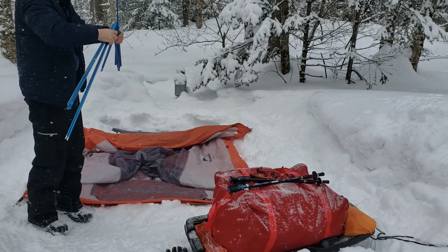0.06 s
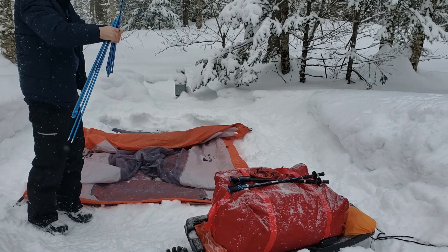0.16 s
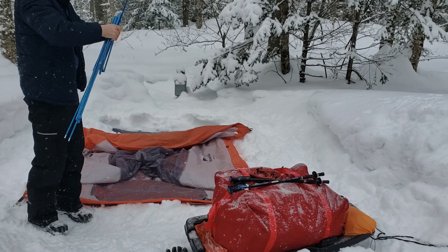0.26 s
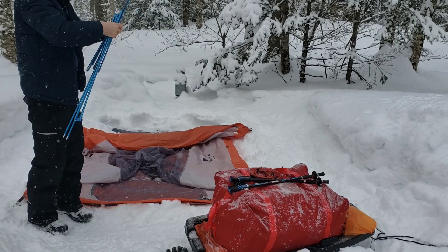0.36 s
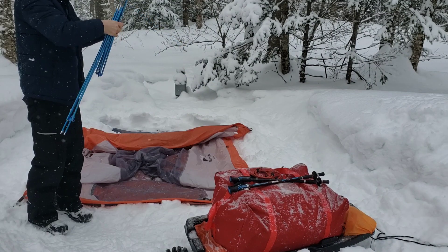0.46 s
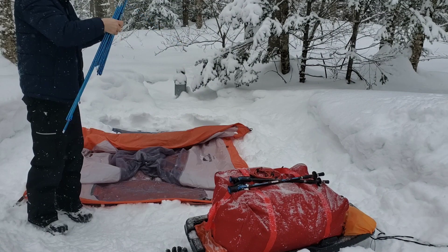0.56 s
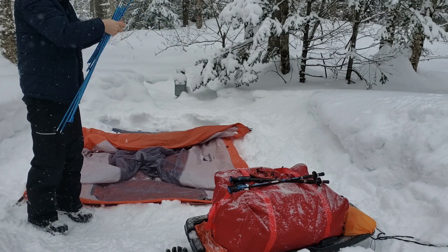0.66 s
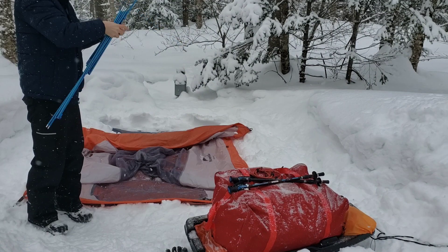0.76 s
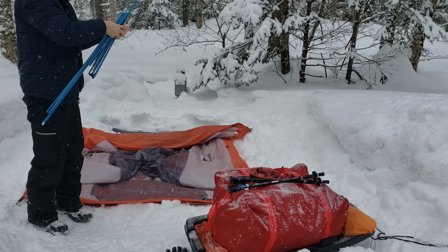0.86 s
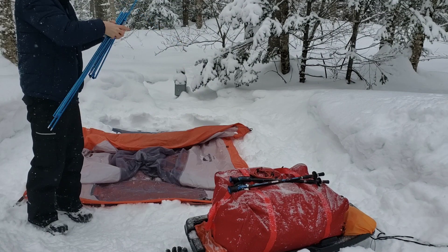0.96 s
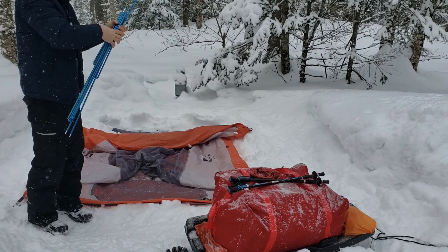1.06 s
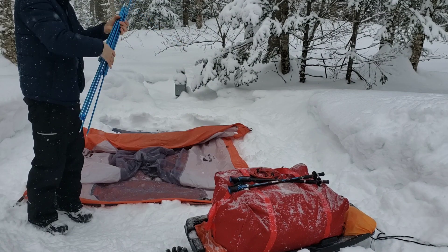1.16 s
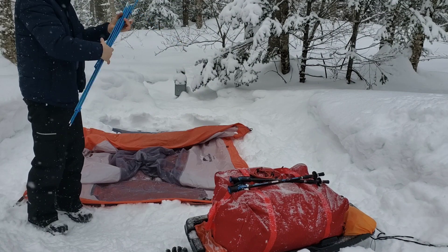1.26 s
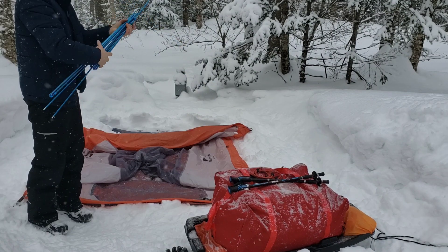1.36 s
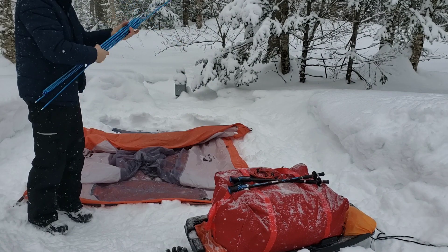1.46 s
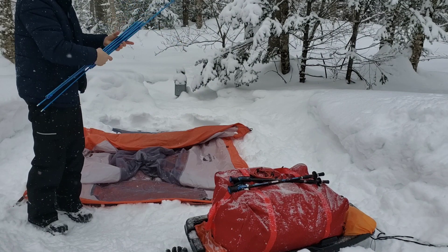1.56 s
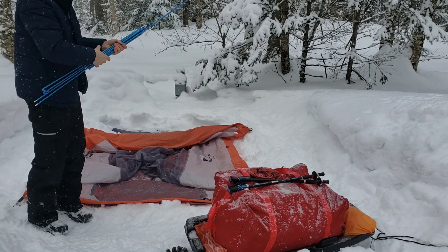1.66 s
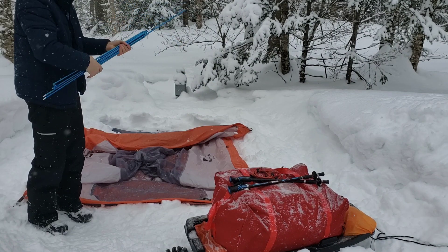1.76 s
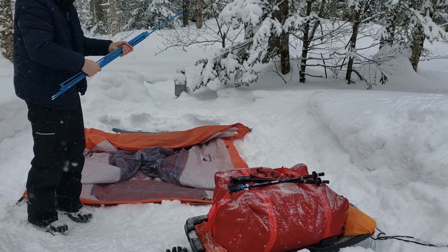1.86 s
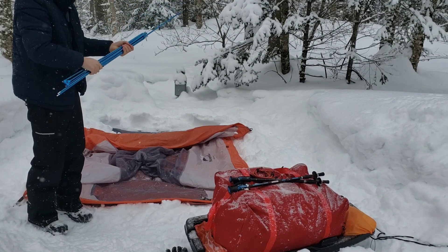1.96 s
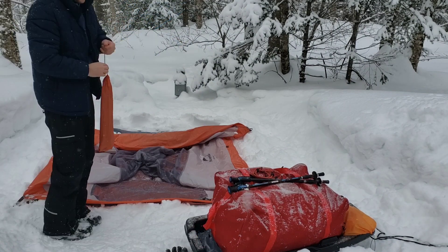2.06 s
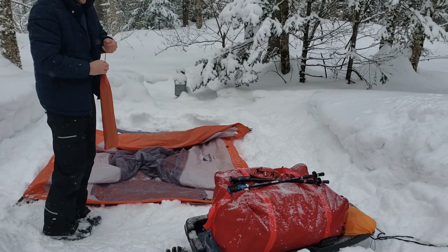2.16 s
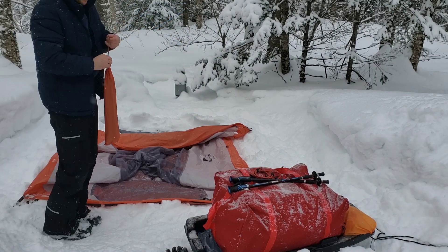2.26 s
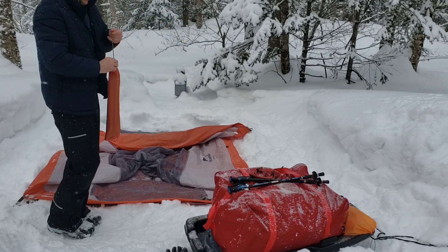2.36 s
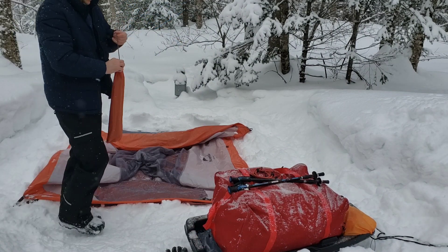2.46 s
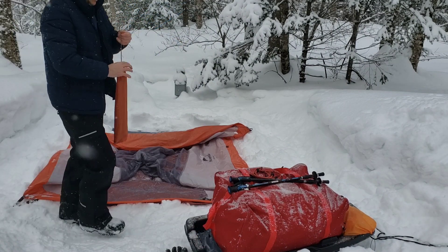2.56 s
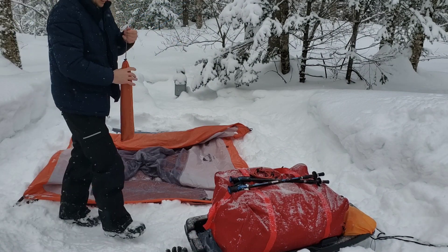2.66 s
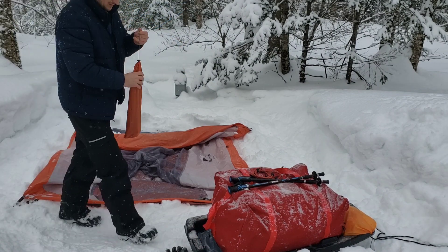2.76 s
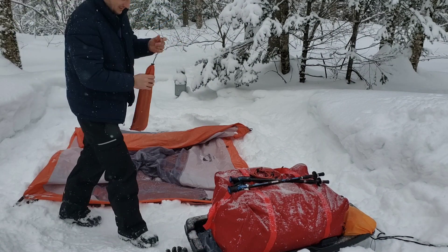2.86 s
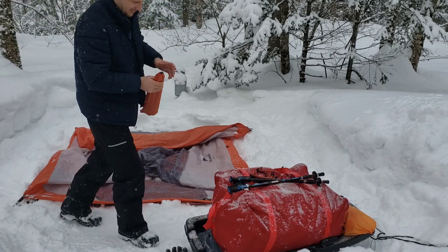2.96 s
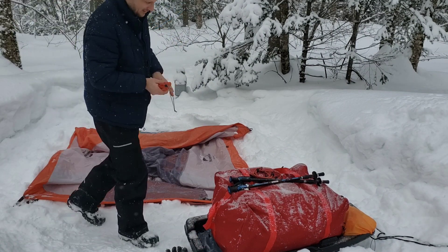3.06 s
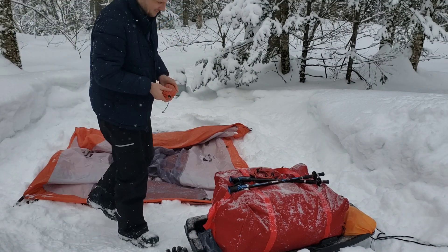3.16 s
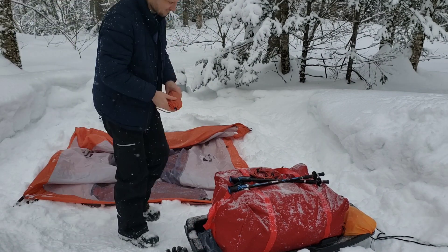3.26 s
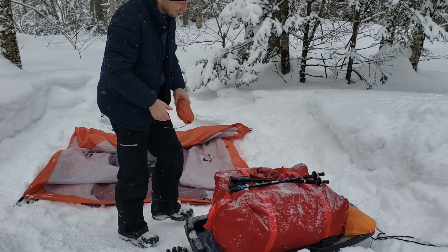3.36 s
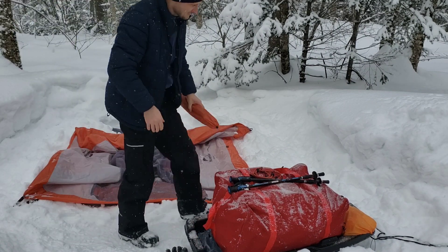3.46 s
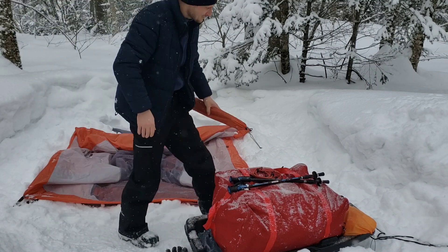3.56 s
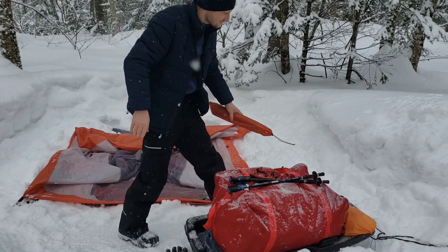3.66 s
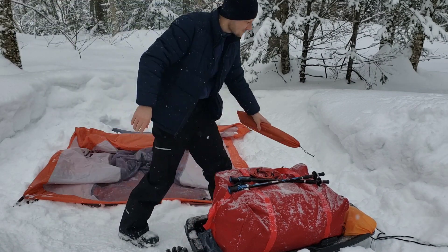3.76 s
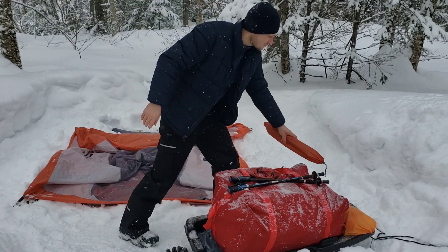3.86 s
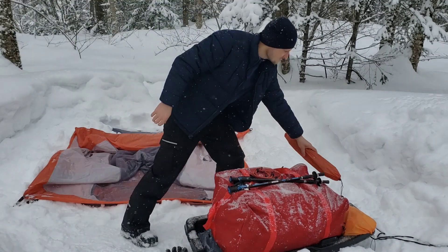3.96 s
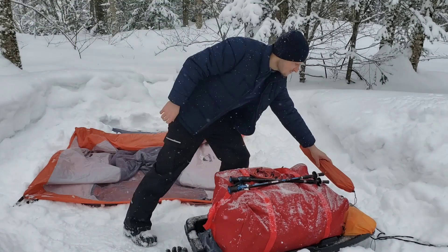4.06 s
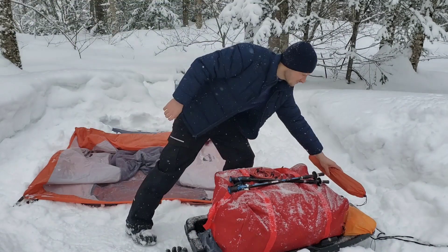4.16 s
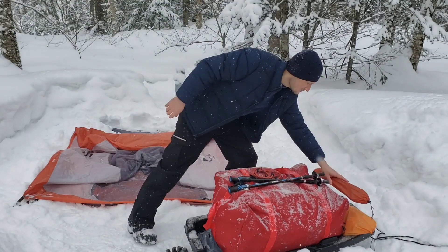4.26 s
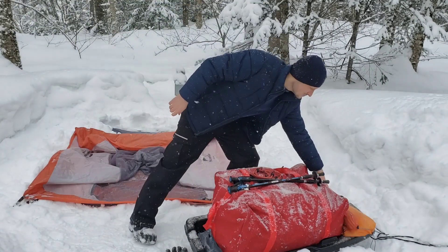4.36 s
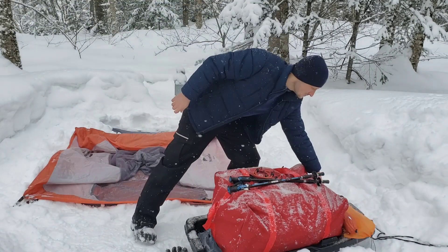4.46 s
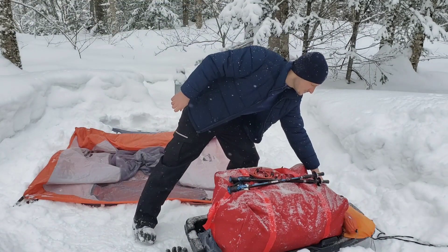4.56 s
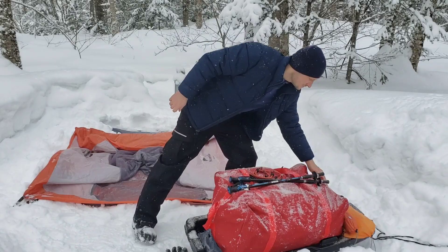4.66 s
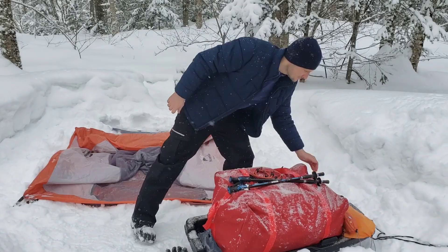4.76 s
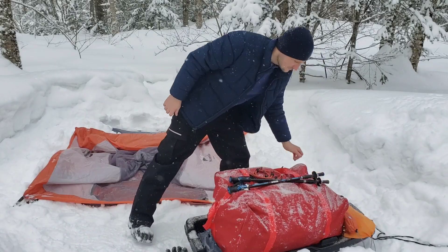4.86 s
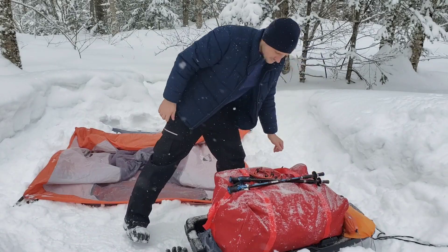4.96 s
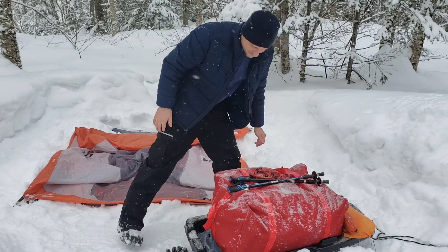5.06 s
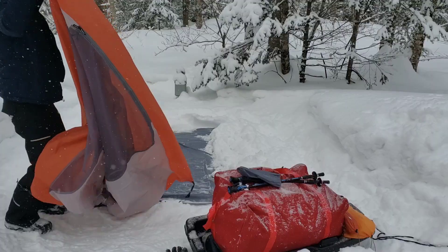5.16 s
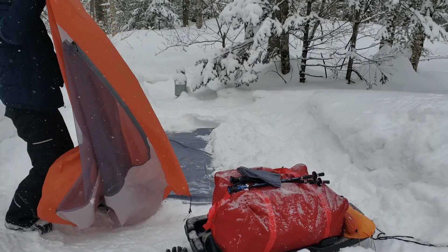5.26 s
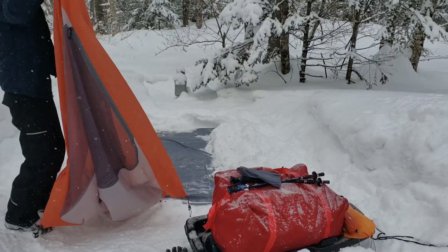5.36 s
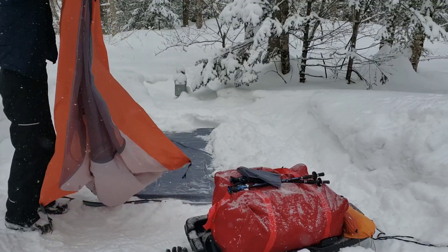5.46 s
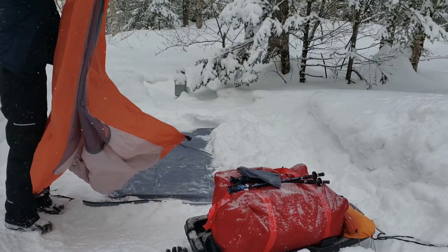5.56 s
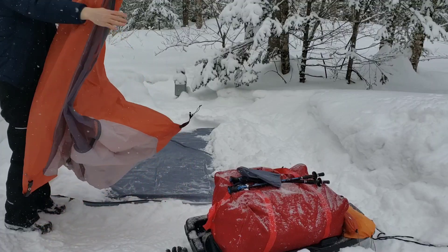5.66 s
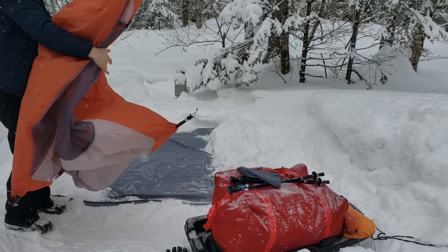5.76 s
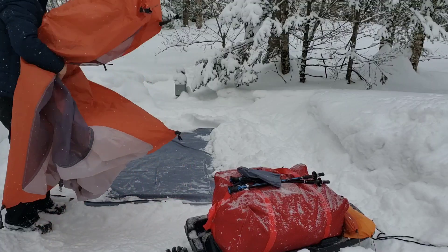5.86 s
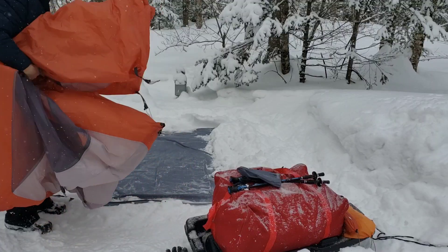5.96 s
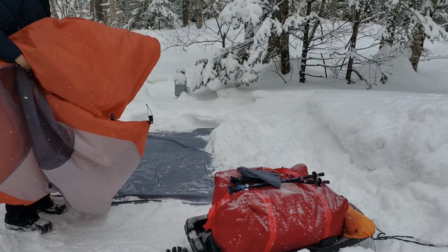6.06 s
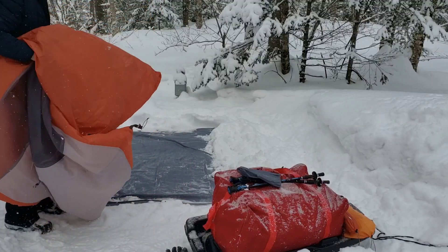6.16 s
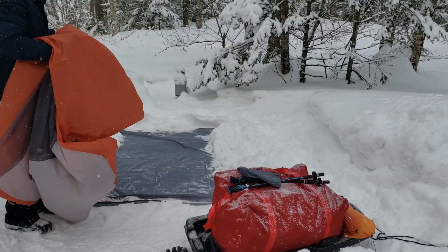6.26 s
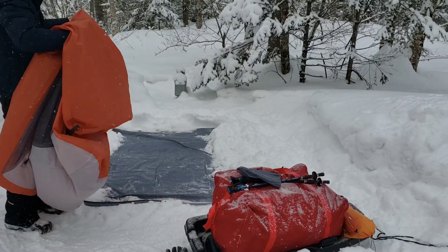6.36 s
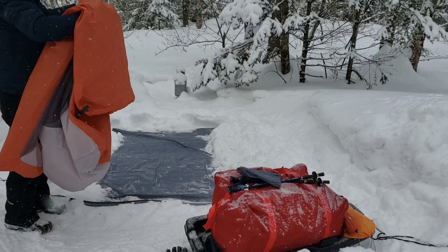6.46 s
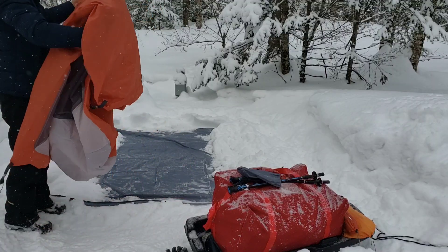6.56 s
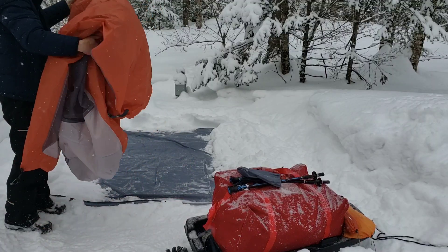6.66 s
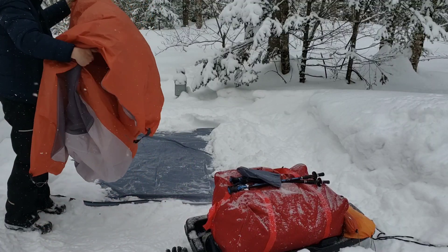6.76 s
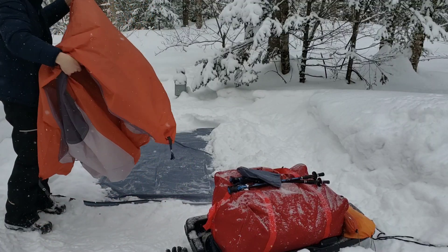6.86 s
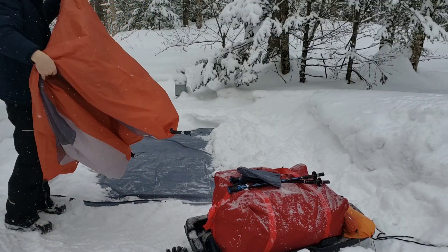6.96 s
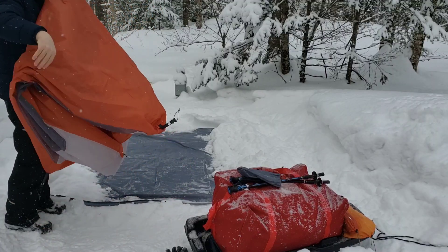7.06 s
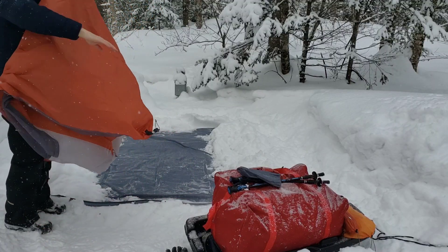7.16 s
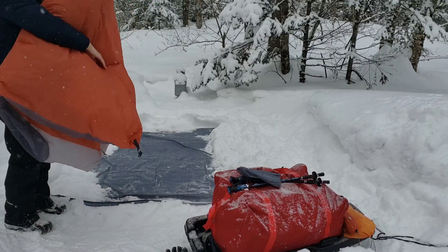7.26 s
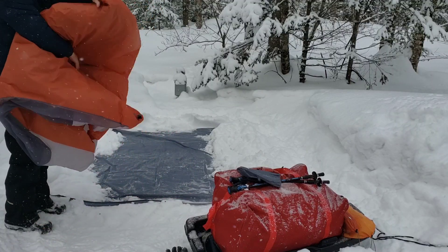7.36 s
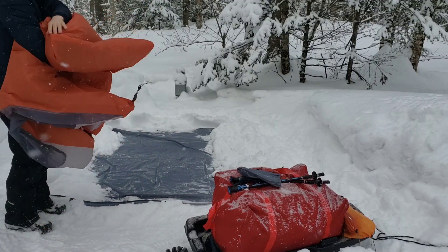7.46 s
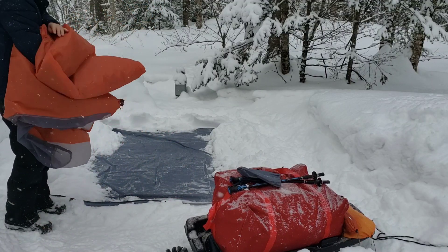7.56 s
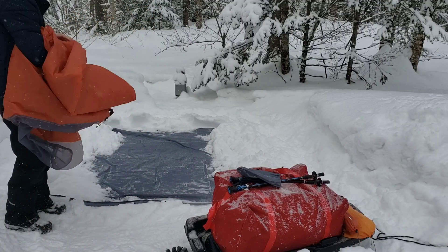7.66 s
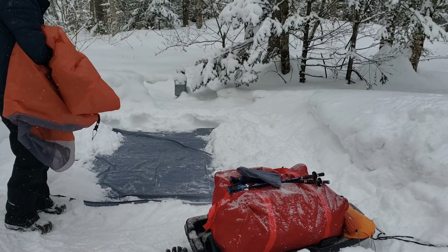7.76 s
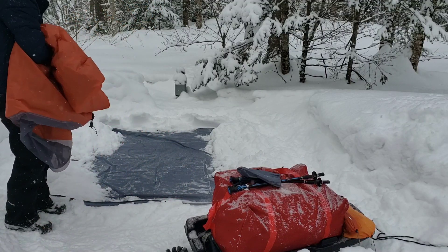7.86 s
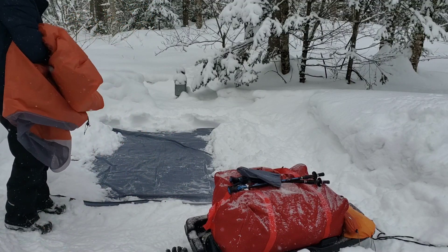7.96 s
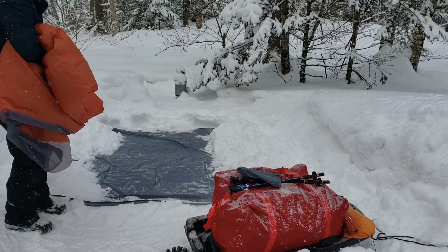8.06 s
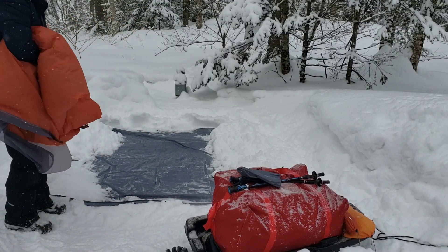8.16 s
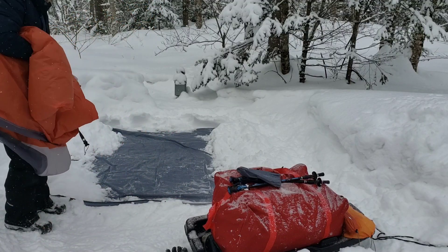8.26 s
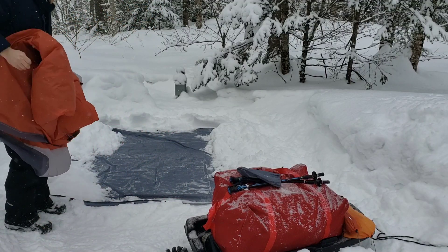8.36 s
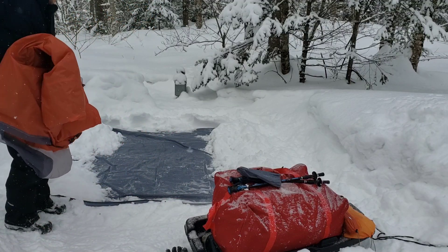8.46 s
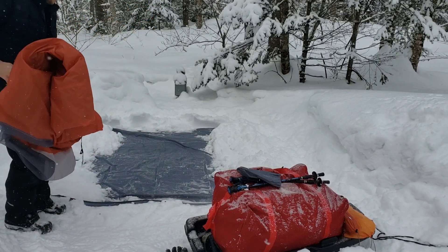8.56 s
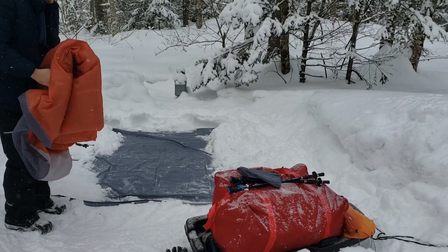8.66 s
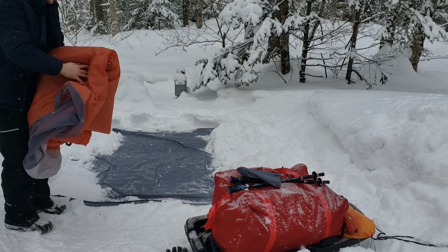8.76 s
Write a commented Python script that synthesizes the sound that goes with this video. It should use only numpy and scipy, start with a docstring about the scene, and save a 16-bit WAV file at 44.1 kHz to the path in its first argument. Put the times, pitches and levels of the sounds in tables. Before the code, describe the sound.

Outdoors in deep snow, a bundle of light aluminium poles clacks and scrapes, growing into a dense rattle. Sleeves swish and boots crunch softly, then a stuff sack lands with a crinkly slap on a duffel. A nylon tent is lifted, gathered, shaken once and rolled with broad rustling. Stereo microphone a few steps away, no echo, faint hiss and light breeze.

```python
"""Folded aluminium poles clack and scrape at once, over a faint hiss and a light breeze on the microphone.
Place: deep snow that returns no echo; a camper packs a tent a few steps from two microphone ports.
Sleeves swish, creases tick and boots squeeze the snow; a stuff sack lands on a duffel; then the nylon tent is
lifted, gathered, shaken once and rolled up. Poles are noise bursts, struck and sliding; snow is groaning
sines with noise; cloth is grainy friction noise in three bands; the breeze is low noise."""
import sys
import numpy as np
from scipy import signal
from scipy.fft import rfft, irfft, next_fast_len
from scipy.io import wavfile
from scipy.ndimage import map_coordinates

SR = 44100
rng = np.random.default_rng(int(sys.argv[2]) if len(sys.argv) > 2 else 0)


def materialize(psi):
    """Save the field psi as 16-bit PCM at rate SR to the path in sys.argv[1].

    A 1-D psi becomes a single channel; in a 2-D psi each row is a channel.
    """
    bounded = np.clip(np.atleast_2d(psi).T, -1, 1)
    quanta = np.round(bounded * 32767).astype(np.int16)
    wavfile.write(sys.argv[1], SR, quanta)


N = 388080


def amp(db):
    """Decibels to gain."""
    return 10 ** (np.asarray(db) / 20)


def unit(x):
    """Scale to rms 1."""
    return x / np.sqrt(np.mean(x ** 2) + 1e-20)


def along(points, hz):
    """Read a curve of (frequency [Hz], value) points on a log frequency axis."""
    f, v = np.transpose(points)
    return np.interp(np.log(hz + 1), np.log(f + 1), v)


def gains(rows, fade=0.0169):
    """A gain per sample for each dB column, closing within fade seconds outside the rows' span."""
    s, *columns = np.transpose(rows)
    t = np.arange(N) / SR
    gate = np.clip(1 + np.minimum(t - s[0], s[-1] - t) / fade, 0, 1)
    return np.array([gate * amp(np.interp(t, s, column)) for column in columns])


def swell(s, rise, t60):
    """A gain that climbs to its peak at s by 60 dB per rise and falls by 60 dB per t60."""
    t = np.arange(N) / SR
    distance = np.maximum((s - t) / rise, (t - s) / t60)
    return amp(np.maximum(-60 * distance, -150))


def puffs(rows):
    """A gain with one smooth bump for each (time [s], length [s], level [dB])."""
    t = np.arange(N) / SR
    return sum(amp(db) * np.exp(-(2 * (t - s) / length) ** 2) for s, length, db in rows)


def wobble(rate):
    """A smooth random curve with rate knots a second."""
    knots = rng.standard_normal(int(N * rate / SR) + 4)
    return map_coordinates(knots, [np.arange(N) * rate / SR])


def filtered(x, response):
    """Multiply the spectrum of x by a real or complex response of frequency."""
    m = next_fast_len(x.shape[-1] + 8192)
    return irfft(rfft(x, m) * response(np.fft.rfftfreq(m, 1 / SR)), m)[..., :x.shape[-1]]


def add(track, s, sound):
    """Mix a sound in at time s."""
    i = max(round(s * SR), 0)
    track[:, i:i + sound.shape[-1]] += sound[..., :N - i]


# level difference between the microphone ports: (frequency [Hz], left over right [dB])
PORT_BALANCE = [(60, 1.8), (400, 3), (1300, 4), (4400, 4.5), (7500, 7), (9500, 0), (12000, -4), (15000, -4)]
# likeness of the two ports: (frequency [Hz], correlation [0-1])
PORT_LIKENESS = [(60, .96), (300, .985), (1000, .93), (2500, .72), (7000, .66), (15000, .45)]


def ports(pair, spectrum, lead_ms=.14):
    """Colour two unrelated noises and hear them at both ports, the left one leading, at rms 1."""
    turn = lambda hz: np.arccos(np.clip(along(PORT_LIKENESS, hz), 0, 1)) / 2
    shared = lambda hz: amp(along(spectrum, hz)) * [np.cos(turn(hz)), np.sin(turn(hz))]
    mid, side = filtered(pair, shared)
    sign = np.array([[1], [-1]])
    level = lambda hz: amp(sign * along(PORT_BALANCE, hz) / 2)
    delay = lambda hz: np.exp(1j * np.pi * sign * hz * lead_ms / 1000)
    return unit(filtered(np.array([mid + side, mid - side]), lambda hz: level(hz) * delay(hz)))


def noise():
    """Two unrelated white noises."""
    return rng.standard_normal((2, N))


def grains(rate, spread_db, life, share):
    """White friction noise; a share of its power comes in short grains, rate a second, of uneven size."""
    sizes = amp(spread_db * np.minimum(rng.standard_normal(N), 2)) ** 2
    hits = (rng.random(N) < rate / SR) * sizes
    power = signal.lfilter([1], [1, -np.exp(-1 / (life * SR))], hits)
    share = np.clip(share, 0, 1)
    return noise() * np.sqrt(1 - share + share * power / power.mean())


def cloth(friction, spectrum, lead_ms=0.15, rub_hz=900, hiss_hz=4000):
    """Cloth's three voices at rms 1: billowing panels, rubbing folds and hissing weave."""
    sheet = ports(friction, spectrum, lead_ms)
    below = lambda hz, edge: 1 / (1 + (hz / edge) ** 6)
    billow = filtered(sheet, lambda hz: below(hz, rub_hz))
    hiss = filtered(sheet, lambda hz: 1 - below(hz, hiss_hz))
    rub = sheet - billow - hiss
    return np.array([unit(billow), unit(rub), unit(hiss)])


def blend(voices, levels):
    """Sum of the voices, each under its own gain curve."""
    return np.sum(voices * levels[:, None], axis=0)


# light breeze: (time [s], relative buffet level [dB])
BREEZE_LEVELS = [(0, -72), (.5, -64.5), (.8, -63.5), (1.5, -75.5), (1.85, -58.5), (2.1, -83.5),
                 (2.8, -77.5), (3.6, -77.5), (4.1, -64.5), (4.6, -77.5), (5.1, -84.5)]
# single eddies on the microphone: (time [s], length [s], relative level [dB])
EDDY_GUSTS = [(0.107, .04, -57), (.32, 0.036, -68), (1.11, 0.028, -54), (1.248, 0.029, -46),
              (1.326, 0.19, -55), (1.902, 0.029, -41.5), (1.965, .07, -50.5), (2.3, 0.091, -72),
              (2.56, .05, -68), (4.44, 0.089, -53.5), (4.83, 0.083, -58)]
# wind buffet: (frequency [Hz], relative level [dB])
BUFFET_SPECTRUM = [(15, -9), (35, -3.5), (60, 3.5), (90, -9), (140, -23.5), (300, -40.5), (900, -120)]
# faint even hiss: (frequency [Hz], relative level [dB])
STILL_SPECTRUM = [(18, -41), (30, -5), (70, -2), (204, -8.5), (239, -9), (374, -12.5), (415, -12.5),
                  (740, -15), (1250, -17.5), (1760, -15), (9970, -26), (14000, -15.5), (16000, -32.5)]


def air(breeze_db=-2, gust_db=-1, lumpy_db=2.5, eddy_db=0, still_db=-78):
    """Eddies buffet the ports, partly each on its own, over a faint even hiss."""
    eddies = unit(filtered(noise(), lambda hz: amp(along(BUFFET_SPECTRUM, hz))))
    both = ports(noise(), BUFFET_SPECTRUM)
    buffet = unit(both + amp(eddy_db) * eddies) * amp([[2.3], [-2.3]])  # left louder
    breeze = amp(breeze_db + lumpy_db * wobble(14)) * gains(BREEZE_LEVELS, fade=.1)[0]
    gusts = amp(gust_db) * puffs(EDDY_GUSTS)
    return (breeze + gusts) * buffet + amp(still_db) * ports(noise(), STILL_SPECTRUM)


# pole against pole: (time [s], relative level [dB], body decay t60 [s], brightness [dB])
POLE_CLACKS = [(.0265, -37, .036, -7.5), (.279, -38.5, .035, 4), (.3038, -41, .026, -2.5),
               (.334, -50.5, 0.068, -12), (.375, -40.5, .033, 1), (.393, -42.5, .059, -6),
               (.5588, -37, .11, 8), (.582, -40.5, .029, 1.5), (.7286, -56.5, 0.037, -1),
               (.7834, -58.5, 0.013, -1), (.803, -52.5, .041, 8), (.8866, -30.5, .073, 5.5),
               (1.0137, -43, .015, -5.5), (1.0767, -36, .033, -7.5), (1.0857, -37, .024, 17.5),
               (1.12, -47, .036, 6.5), (1.1939, -50.5, .022, -12), (1.2411, -41.5, .041, -3),
               (1.2651, -32.5, 0.019, 5), (1.2719, -41.5, 0.026, 0), (1.2835, -28.5, .033, 7.5),
               (1.3184, -40, .05, 0.5), (1.3262, -30, .025, 3), (1.3681, -34, .025, 0.5),
               (1.4291, -40.5, .05, -8), (1.4341, -31, .019, 9), (1.4497, -37, .027, 2.5),
               (1.4827, -28, 0.036, 5), (1.5076, -35, .06, 6.5), (1.5439, -35, .051, 5.5),
               (1.5614, -35.5, .01, 8), (1.5758, -29, .017, 5.5), (1.5819, -28.5, .01, 15.5),
               (1.6098, -32.5, .02, 7.5), (1.6965, -39, .05, -4), (1.7296, -32.5, .01, -1),
               (1.752, -43.5, .044, 0.5), (1.8477, -31, 0.028, 1), (1.8611, -32.5, .015, -2.5),
               (1.9328, -32, 0.013, -4)]


def contacts(count=16, first_s=1.02, last_s=1.72, mean_db=-53, spread_db=6, t60=.028):
    """The firm clacks, and light touches at random times while the bundle is shuffled."""
    touches = []
    for u, v in rng.random((count, 2)):
        s = first_s + u * (last_s - first_s)
        touches.append((s, mean_db + spread_db * (2 * v - 1), t60, 0))
    return list(POLE_CLACKS) + touches


# struck metal: (frequency [Hz], relative level [dB])
METAL_SPECTRUM = [(180, -47), (300, -23.5), (392, -43.5), (593, -36.5), (900, -44.5), (1480, -37),
                  (2320, -15), (3030, -6), (4440, -2.5), (6200, 3.5), (7080, 2.5), (10000, -6),
                  (13500, -4.5), (14700, -10.5), (16000, -6)]
# buzzing tubes: (centre [Hz], width [Hz], relative level [dB])
TUBE_MODES = [(2517, 88, 17.5), (5240, 180, -4.5), (7130, 260, -13), (11960, 350, -20.5), (14510, 400, -7)]
# the hand loosens and lets the tubes buzz, or clamps them so that the bundle knocks:
# (time [s], buzz relative to clack [dB], knock relative to clack [dB])
HAND_GRIP = [(0, -36, -50), (.8, -44, -52), (.87, -22, -57), (1.08, -32.5, -44.5), (1.2, -42, -35),
             (1.45, -46.5, -35.5), (1.51, -44, -23), (1.57, -40.5, -33), (2, -39, -49)]


def pole_clacks(level_db=2, attack=0.0014, crack_db=0, crack_t60=0.0064, body_db=-2.5, rattle_db=-24,
                rattle_t60=0.11, ring_t60=0.21, bright_hz=9500, knock_t60=0.21,
                echo_min_s=.0004, echo_max_s=.0014, echo_share=.6):
    """Each contact is a hard crack, damped by the grip; the tubes touch, so they buzz rather than sing."""
    out, t = np.zeros((2, N)), np.arange(SR // 4) / SR
    metal = ports(noise(), METAL_SPECTRUM)
    top = filtered(metal, lambda hz: 1 / (1 + (bright_hz / (hz + 1)) ** 8))
    knock_spectrum = [(150, -26.5), (330, -10.5), (600, -10), (900, -15.5), (1800, 0.0), (2600, 1.0), (4000, -19)]
    knocking = ports(noise(), knock_spectrum)
    modes = lambda f: sum(amp(db) / (1 + (2 * (f - hz) / width) ** 2) for hz, width, db in TUBE_MODES)
    buzz = unit(filtered(noise(), modes)) * amp([[2], [-2]])  # left louder
    grip_s, buzz_db, knock_db = np.transpose(HAND_GRIP)
    onset = np.minimum(t / attack, 1)
    crack = amp(crack_db - 60 * np.abs(t - attack) / crack_t60)
    rows = contacts()
    spots = rng.random(len(rows))
    for k, (s, db, t60, bright_db) in enumerate(rows):
        part = slice(k * SR // 10, k * SR // 10 + len(t))  # a fresh stretch of noise
        burst = unit(metal[:, part] + (amp(bright_db) - 1) * top[:, part])
        # the wave returns from the tube's end: each spot has its own colour
        lag = round(SR * (echo_min_s + (echo_max_s - echo_min_s) * spots[k]))
        burst = unit(burst + echo_share * np.roll(burst, lag))
        body = amp(body_db - 60 * t / t60)
        rattle = amp(rattle_db - 60 * t / rattle_t60)
        ring = buzz[:, part] * amp(np.interp(s, grip_s, buzz_db) - 60 * t / ring_t60)
        knock = knocking[:, part] * amp(np.interp(s, grip_s, knock_db) - 60 * t / knock_t60)
        struck = burst * (crack + body + rattle) + ring + knock
        add(out, s, onset * amp(db + level_db) * struck)
    return out


# poles sliding in the bundle: (peak time [s], rise [s], decay t60 [s], level [dB])
POLE_SLIDES = [(.1, 0.23, 0.098, -52), (.265, 0.29, 0.31, -50.5), (.405, 0.075, 0.11, -53.5),
               (.51, 0.29, 0.16, -40), (.58, 0.18, 0.28, -52.5), (.96, 0.59, 0.17, -56),
               (1.06, 0.19, 0.26, -52.5), (1.32, 0.5, 1.94, -53), (1.6, 0.28, 0.1, -55.5),
               (1.72, 0.19, 0.11, -56), (1.95, 0.26, 0.16, -54)]
# scraped tubes: (frequency [Hz], relative level [dB])
SCRAPE_SPECTRUM = [(290, -74.5), (500, -45), (1550, -41), (2570, -23.5), (4030, -3.5), (5090, -10.5),
                   (6700, -5.5), (9920, -15.5), (10700, -13), (12000, -11), (13300, -14.5), (14700, -10.5),
                   (16000, -26.5)]


def pole_slide(level_db=0, tick_db=-6):
    """Tubes scrape along one another in a dense rasp of tiny catches, with a few sharper ticks."""
    rasp = grains(rate=900, spread_db=3, life=.001, share=.4)
    ticks = grains(rate=70, spread_db=3, life=.0007, share=1)
    strokes = sum(amp(db) * swell(s, rise, t60) for s, rise, t60, db in POLE_SLIDES)
    return amp(level_db) * strokes * ports(rasp + amp(tick_db) * ticks, SCRAPE_SPECTRUM)


# a sleeve or the sack brushing past:
# (peak time [s], rise [s], decay t60 [s], relative hiss level [dB], billow and rub over hiss [dB])
SLEEVE_SWISHES = [(2.238, 0.069, 0.28, -66, -17), (2.42, 0.17, 0.23, -59.5, -12.5),
                  (2.71, 0.2, 0.47, -64.5, -14.5), (2.81, 0.077, 0.28, -57, -11.5),
                  (3.05, 0.54, 0.24, -71, -26), (3.148, 0.026, 0.098, -47, -13),
                  (3.3, 0.54, 0.17, -59, -7.5), (3.4, 0.18, 0.47, -63, -7), (3.48, 0.51, 0.24, -59, -0.5),
                  (3.635, 0.02, 0.13, -68, -3.5), (3.93, 0.61, 1, -71, -11), (4.36, 0.33, .3, -64.5, -13)]
# jacket cloth: (frequency [Hz], relative level [dB])
JACKET_SPECTRUM = [(100, -4), (400, 8.5), (1000, -10), (2200, -8), (4300, -2.5), (7000, 11.5), (9500, -1),
                   (12000, 0.5), (15000, -1)]


def clothes(billow_db=-5, rub_db=2, hiss_db=-1):
    """Jacket sleeves and the sack swish: fabric friction in short, uneven grains."""
    friction = grains(rate=300, spread_db=6, life=.001, share=.27)
    voices = cloth(friction, JACKET_SPECTRUM, lead_ms=.06)
    levels = 0
    for s, rise, t60, db, body_db in SLEEVE_SWISHES:
        levels = levels + amp([[db + body_db], [db + body_db], [db]]) * swell(s, rise, t60)
    return blend(voices, levels * amp([[billow_db], [rub_db], [hiss_db]]))


# stiff creases snapping over: (time [s], relative level [dB])
CREASE_SNAPS = [(2.233, -59), (2.2989, -61), (2.7211, -54), (2.8073, -44), (2.84, -50), (3.1458, -55),
                (3.2656, -54), (3.318, -45), (4.0837, -61), (4.4014, -35), (4.4205, -37.5), (4.4351, -30.5),
                (4.4547, -39), (5.1746, -54.5), (5.5895, -48), (5.7018, -57.5), (5.8745, -41),
                (7.2976, -33), (7.7099, -51), (7.8578, -51), (7.915, -42), (8.0214, -44), (8.604, -45.5),
                (8.7134, -48)]
# snapping creases, in the tent's crinkle too: (frequency [Hz], relative level [dB])
CREASE_SPECTRUM = [(300, -36), (1500, -8.5), (4000, 0), (6000, 4), (7200, 12.5), (9500, -24), (12000, 1.5),
                   (15000, 2.5)]


def creases(level_db=7, tail_db=-26, tail_t60=.08):
    """A taut crease flips with a dry tick and shivers the cloth around it."""
    shape, t = np.zeros((1, N)), np.arange(SR // 10) / SR
    tick = amp(-60 * t / .01)
    shiver = amp(tail_db - 60 * t / tail_t60)
    for s, db in CREASE_SNAPS:
        add(shape, s, amp(db + level_db) * (tick + shiver))
    return shape * ports(noise(), CREASE_SPECTRUM)


# boots dragged through snow:
# (peak time [s], rise [s], decay t60 [s], level [dB], resonance [Hz], half width [octaves])
BOOT_SCUFFS = [(2.405, 0.14, 0.21, -61, 1490, 0.35), (2.7, .2, 0.77, -75.5, 1365, 0.24),
               (2.98, 0.42, 0.55, -63, 590, 1.25), (3.455, 0.2, 0.087, -54, 363, 0.43),
               (3.82, 0.28, 0.25, -71.5, 490, 0.89), (4.12, 0.38, 0.26, -66.5, 496, 0.65)]


def scuffs(level_db=0):
    """A sole ploughs through the crystals, which rasp in one broad resonance."""
    out = np.zeros((2, N))
    friction = grains(rate=110, spread_db=0.5, life=0.0008, share=0.57)
    rasp = ports(friction, [(100, 0), (4000, 0)])
    for s, rise, t60, db, hz, width in BOOT_SCUFFS:
        edges = np.clip(hz * np.exp2([-width, width]), 20, SR / 3)
        band = signal.sosfilt(signal.butter(2, edges, "bandpass", fs=SR, output="sos"), rasp)
        out += amp(db + level_db) * swell(s, rise, t60) * unit(band)
    return out


# a boot's weight packing the snow:
# (time [s], length [s], level of the last slip [dB], first pitch [Hz], last pitch [Hz])
BOOT_STEPS = [(2.938, 0.036, -42.5, 410, 390), (2.986, 0.0197, -36, 235, 151), (3.794, .03, -50, 95, 135),
              (3.985, .06, -47.5, 100, 91), (4.115, .06, -43, 94.5, 115), (5.083, 0.0067, -43, 167, 174),
              (5.221, .04, -36.5, 140, 149)]


def slips(cycles_per_slip=5, load_db=4, grit_db=-8, grit_fade_db=4.5):
    """Snow gives way every few cycles of its groan, louder and less gritty: (s, dB, Hz, grit dB)."""
    for s, length, db, first_hz, last_hz in BOOT_STEPS:
        count = 1 + round(length * (first_hz + last_hz) / 2 / cycles_per_slip)
        for left in np.linspace(0, 1, count):  # the share of the step still to come
            hz = last_hz + (first_hz - last_hz) * left
            yield s + length * (1 - left), db - load_db * left, hz, grit_db - grit_fade_db * (1 - left)


def boots(level_db=0, cycles=5, crunch_db=-2, crunch_t60=0.012, settle_db=-18, settle_t60=.12):
    """Snow collapses in slips: a low, quickly damped groan, a crunch of crystals and a dull settling."""
    out, t = np.zeros((2, N)), np.arange(SR // 5) / SR
    snapping = grains(rate=300, spread_db=4, life=.0012, share=.55)
    crunch = ports(snapping, [(100, -21), (400, 18.5), (1500, -2), (2500, -20.0), (6000, -33.5)])
    settle = ports(noise(), [(30, -29.0), (120, 6.5), (350, 1), (800, -19), (2500, -42.5)])
    for s, db, hz, grit_db in slips():
        part = slice(round(s * SR), round(s * SR) + len(t))
        damping = amp(-30 * t * hz / cycles)  # 30 dB in so many cycles
        groan = np.sin(2 * np.pi * hz * t) * damping * np.minimum(t * hz * 2, 1)
        crystals = crunch[:, part] * amp(grit_db + crunch_db - 60 * t / crunch_t60)
        settling = settle[:, part] * amp(settle_db - 60 * t / settle_t60)
        add(out, s, amp(db + level_db) * (groan + crystals + settling))
    return out


# cloth struck or shaken: (peak time [s], rise [s], decay t60 [s],
# billow level [dB], rub level [dB], hiss level [dB], thump level [dB]), the first three before the side's tilt
CLOTH_SLAPS = [(4.442, 0.12, 0.11, -45.5, -38, -30.5, -41), (4.45, 0.61, 0.8, -78, -66.5, -60, -72),
               (4.637, 0.0079, 0.094, -66, -52.5, -59.5, -79),
               (7.308, 0.083, 0.29, -36.5, -33.5, -38.5, -41)]
# nylon, for the tent too: (frequency [Hz], relative level [dB])
NYLON_SPECTRUM = [(40, -33), (120, -10), (200, -9.5), (320, -2), (450, -1), (800, -2.5), (1300, -4.5),
                  (2000, -4.5), (3000, -5), (4300, -5.5), (7200, -7.5), (9200, -11.5), (11500, -11.5),
                  (15000, -10.5)]


def slaps(level_db=0):
    """The sack lands on the duffel to the right, the tent cracks taut on the left: each crumples and thumps."""
    out = np.zeros((2, N))
    crumple = grains(rate=600, spread_db=3.5, life=.001, share=.35)
    on_left = cloth(crumple, NYLON_SPECTRUM)
    on_right = cloth(crumple, NYLON_SPECTRUM, lead_ms=-.14) * amp([[-3], [3]])
    thump = ports(noise(), [(20, -19.0), (60, -3), (120, 1), (220, -4.5), (400, -20), (2000, -95.5)])
    for s, rise, t60, *levels, thump_db in CLOTH_SLAPS:
        voices = on_right if s < 5 else on_left  # the sack comes first
        body = amp(level_db) * blend(voices, amp(levels)[:, None]) + amp(thump_db) * thump
        out += body * swell(s, rise, t60)
    return out


# how hard the nylon is worked in each move, in order:
# (time [s], relative rub level [dB], billow over rub [dB], hiss over rub [dB])
LIFT_MOVE = [(5.13, -61.5, -15, 3.5), (5.17, -61.5, -14, 3.5), (5.32, -57, -7.0, 2),
             (5.43, -44.5, -10.5, -2), (5.5, -52.5, -4.5, 1.5), (5.57, -59, -12, 2.5),
             (5.65, -65.0, -2.5, 1.5)]
GATHER_MOVE = [(5.72, -55, -5, 0.5), (5.82, -50, -7, -3.5), (5.93, -48, -4, 0.5), (6.05, -47, -3, 0),
               (6.2, -54.5, -8.5, 3.5), (6.4, -53.5, -4.5, 3), (6.52, -56.5, -9, 3), (6.63, -60, -2, 1.5)]
FOLD_MOVE = [(6.71, -55.5, -3.5, 0), (6.76, -60, -5, 1.5), (6.89, -49.5, -10, -0.5), (6.96, -54.5, -7.5, 2),
             (7.03, -54.5, -7, 0), (7.15, -57, -3.5, 3), (7.25, -57, -3, 1.5)]
SETTLE_MOVE = [(7.4, -50, -1.5, 2.5), (7.52, -52.5, -5.5, 5), (7.63, -56, -1.5, 10.5), (7.79, -64, -7.5, 3),
               (8.02, -61, -7.5, 0)]
ROLL_MOVE = [(8.15, -55, -0.5, 0), (8.24, -60.5, -4.5, 3.5), (8.39, -56.5, -1.5, 9.5), (8.44, -65, 4, 2.5),
             (8.51, -74.5, -9, 7.5), (8.6, -59, 1, 6.5), (8.66, -54.5, -3, -2.0), (8.72, -49, -6.5, -1),
             (8.792, -53, -3, 4)]
# a hanging panel flaps: (time [s], length [s], level [dB])
PANEL_FLAPS = [(5.46, 0.06, -56.5), (5.82, 0.078, -57), (6.08, 0.077, -52), (6.41, 0.076, -61.5),
               (7.34, 0.22, -60), (8.17, 0.098, -69), (8.36, 0.19, -70), (8.77, 0.13, -77)]
# air shoved by the panels: (frequency [Hz], relative level [dB])
WAFT_SPECTRUM = [(15, -51), (45, 5), (120, 4), (180, -3.5), (260, -4.5), (700, -42)]


def tent(billow_db=0, rub_db=1, hiss_db=1.0, flutter_db=1.22, shove_db=-11, shove_fade_db_per_s=4.5,
         flap_db=0, crinkle_db=-13):
    """Wide panels slide over each other and shove the air; small folds buckle as the cloth flutters."""
    moves = np.vstack([LIFT_MOVE, GATHER_MOVE, FOLD_MOVE, SETTLE_MOVE, ROLL_MOVE])
    s, work_db, full_db, bright_db = moves.T
    push_db = work_db - shove_fade_db_per_s * (s - s[0])  # less air is shoved as the bundle shrinks
    curves = np.transpose([s, work_db + full_db, work_db, work_db + bright_db, push_db])
    *voices, push = gains(curves)
    flutter = amp(flutter_db * np.array([wobble(70), wobble(45), wobble(30) / 2]))
    levels = np.array(voices) * flutter * amp([[billow_db], [rub_db], [hiss_db]])
    buckling = grains(rate=260, spread_db=4, life=.0007, share=.36)
    sheet = blend(cloth(buckling, NYLON_SPECTRUM), levels)
    # the odd stiffer fold stands out of the hiss
    snaps = grains(rate=35, spread_db=2.5, life=.0004, share=1)
    crinkle = amp(crinkle_db) * levels[2] * ports(snaps, CREASE_SPECTRUM)
    push_and_flaps = amp(shove_db) * push + amp(flap_db) * puffs(PANEL_FLAPS)
    return sheet + crinkle + push_and_flaps * ports(noise(), WAFT_SPECTRUM)


def scene():
    """Everything is heard dry across the snow."""
    poles = pole_clacks() + pole_slide()
    steps = scuffs() + boots()
    fabric = clothes() + creases() + slaps() + tent()
    return air() + poles + fabric + steps


def record(dry, top_hz=15750):
    """The microphone's track keeps nothing from its band limit upward."""
    return filtered(dry, lambda hz: hz < top_hz)


dry = scene()
out = record(dry)
materialize(out)
```